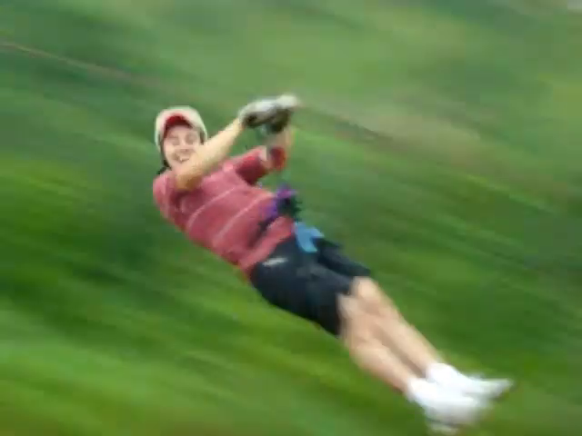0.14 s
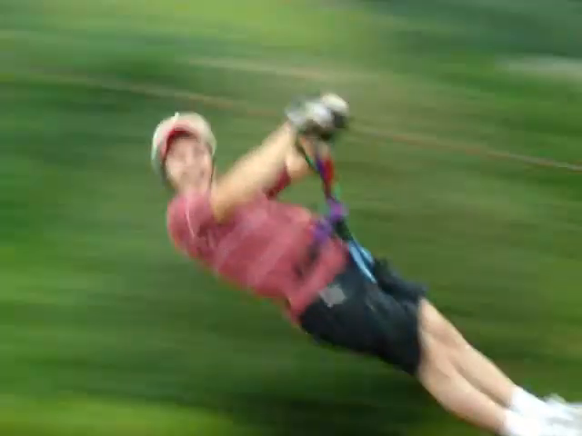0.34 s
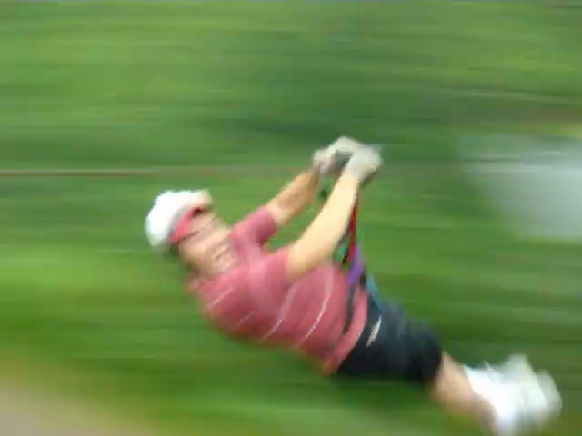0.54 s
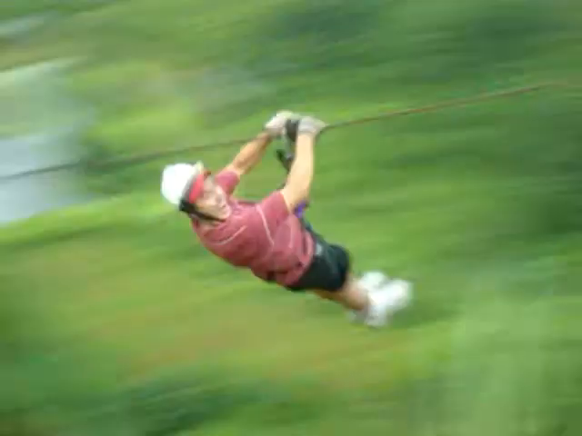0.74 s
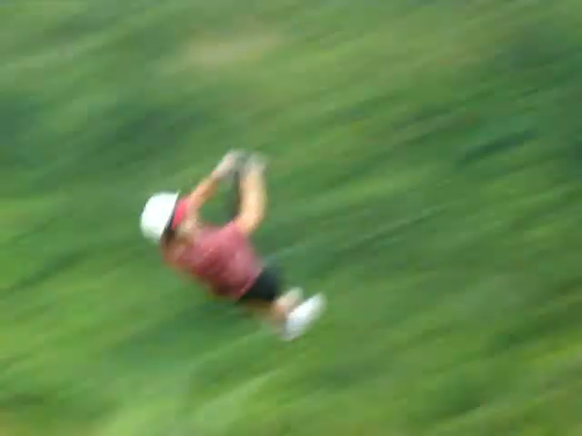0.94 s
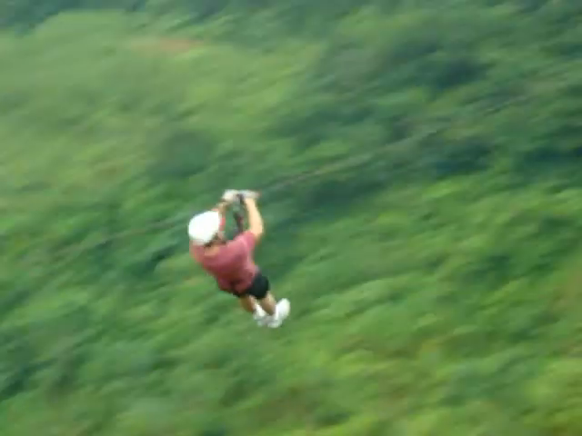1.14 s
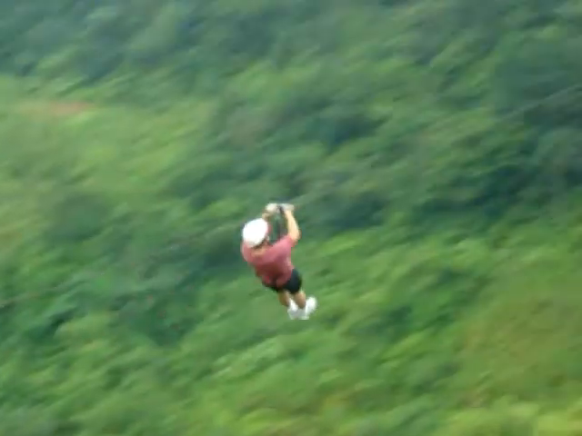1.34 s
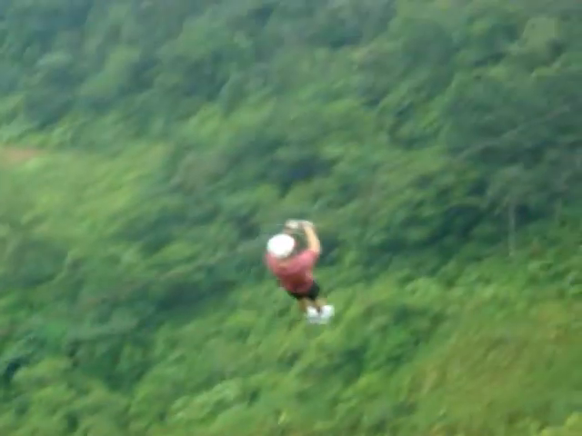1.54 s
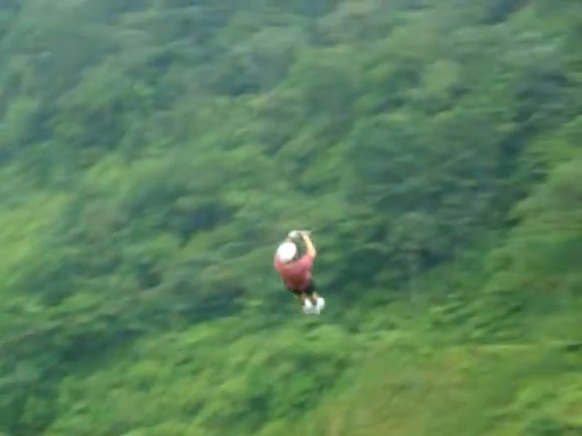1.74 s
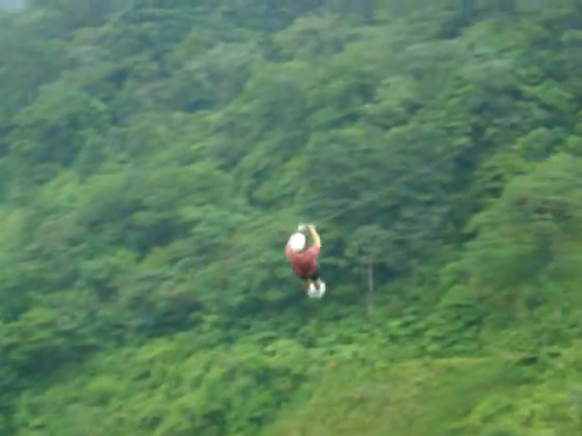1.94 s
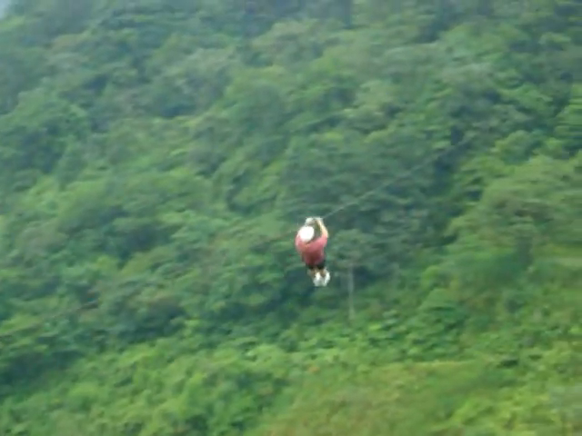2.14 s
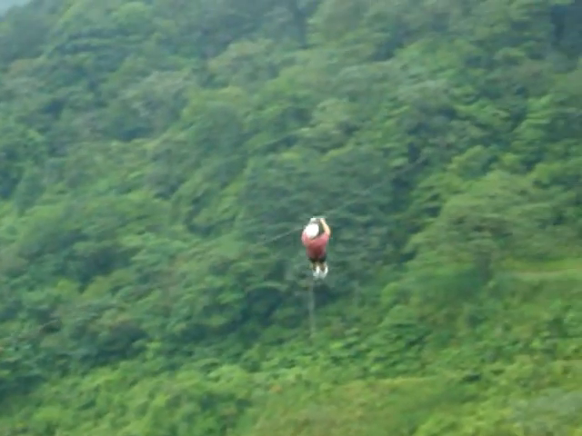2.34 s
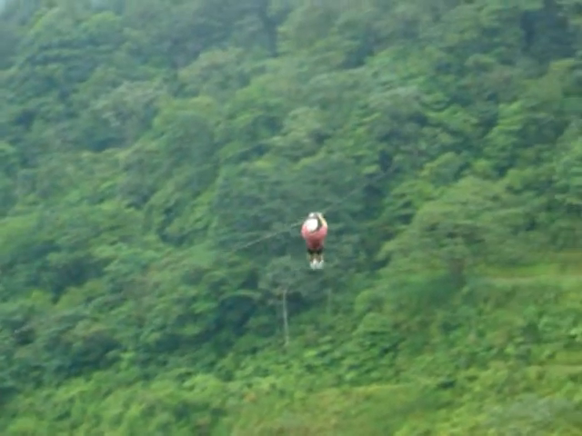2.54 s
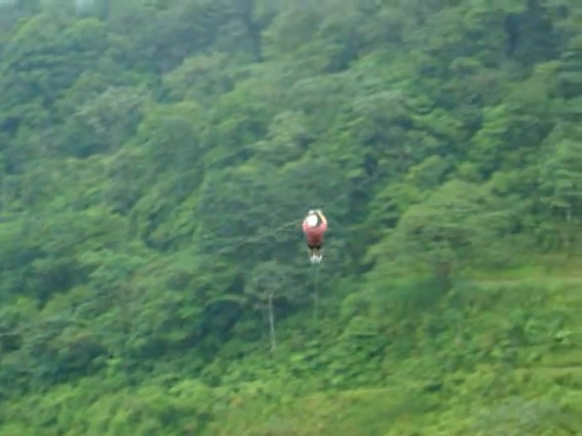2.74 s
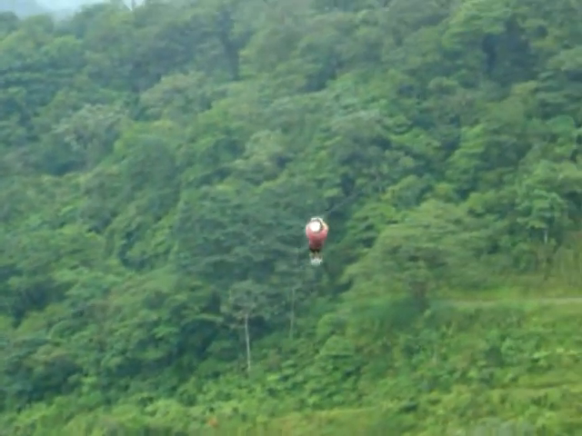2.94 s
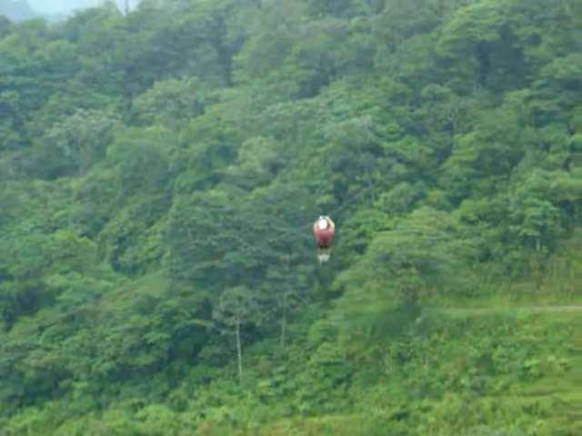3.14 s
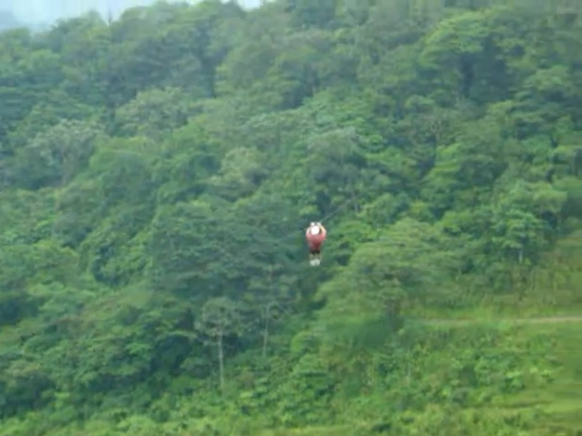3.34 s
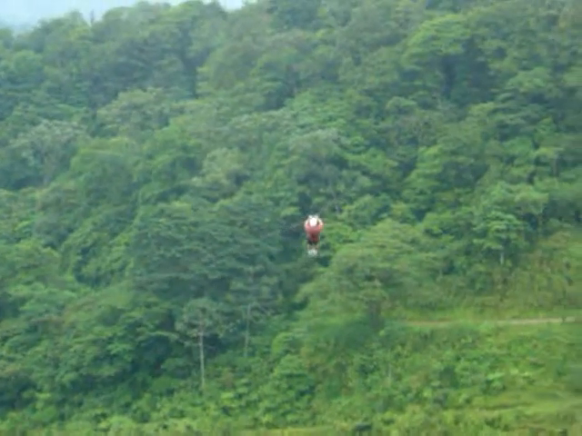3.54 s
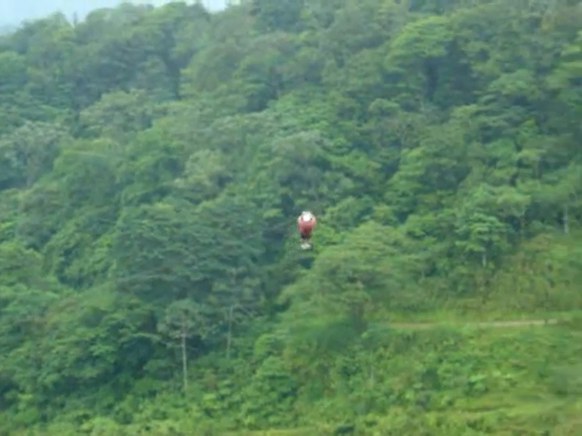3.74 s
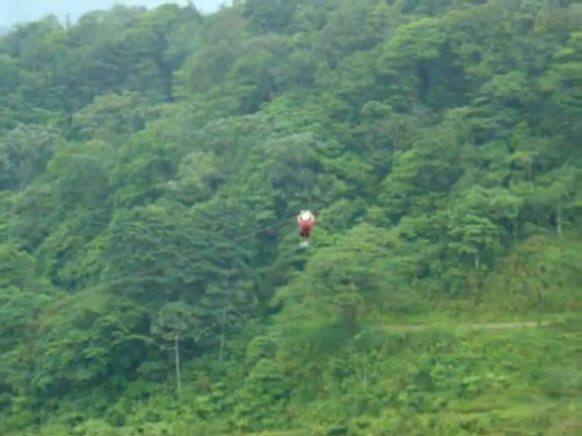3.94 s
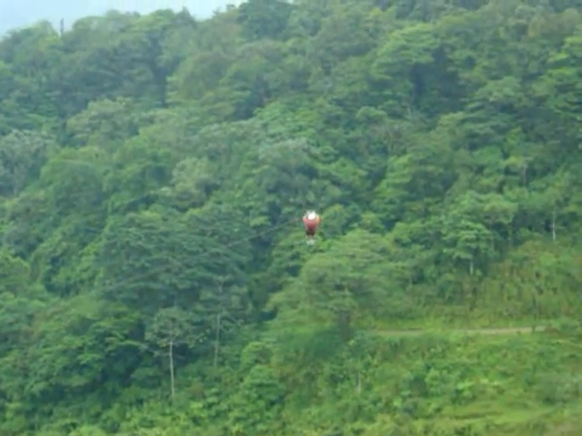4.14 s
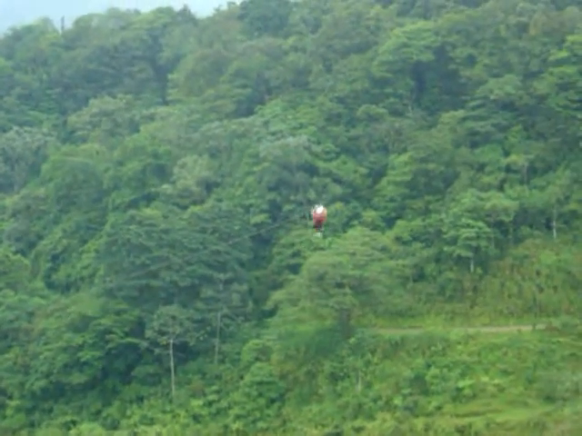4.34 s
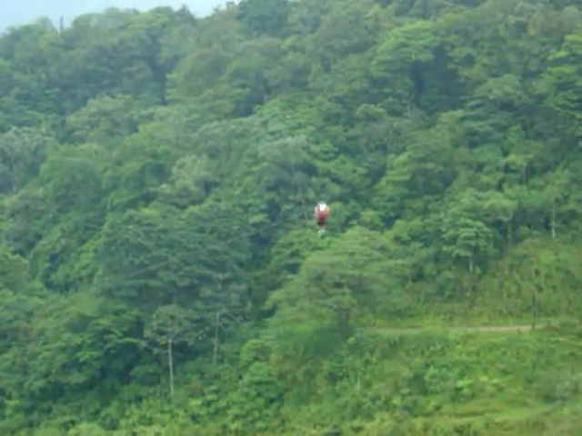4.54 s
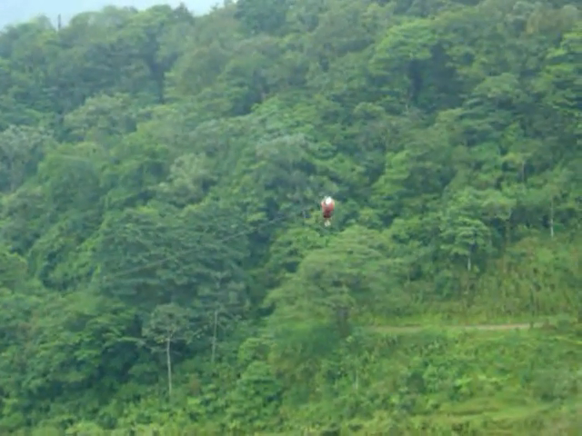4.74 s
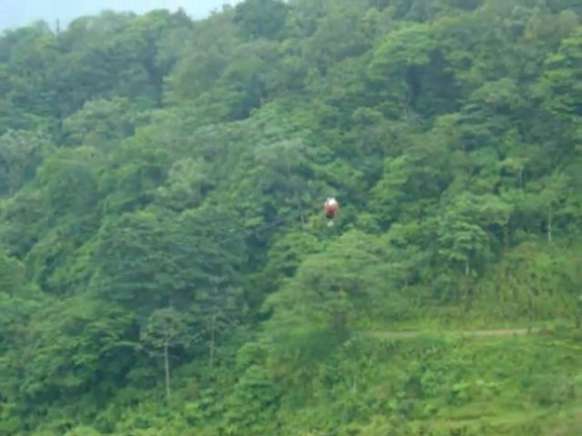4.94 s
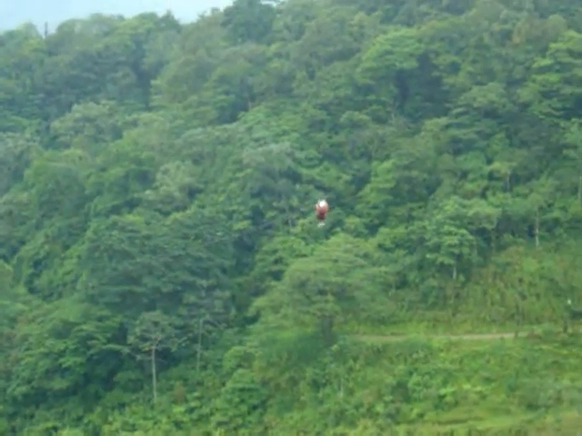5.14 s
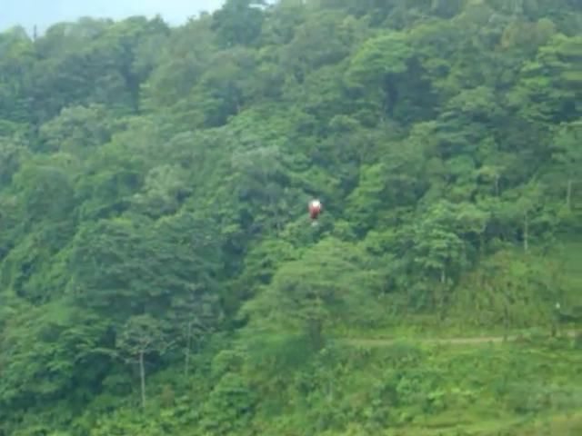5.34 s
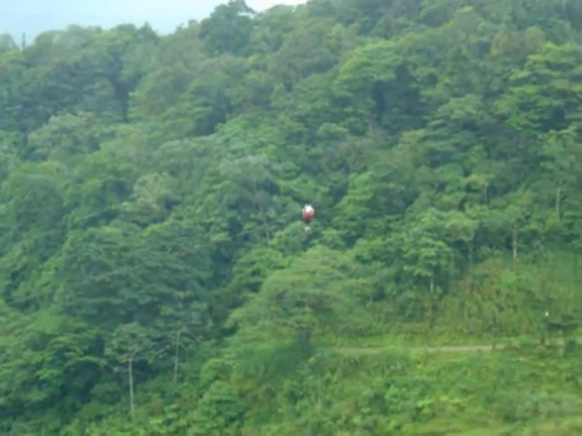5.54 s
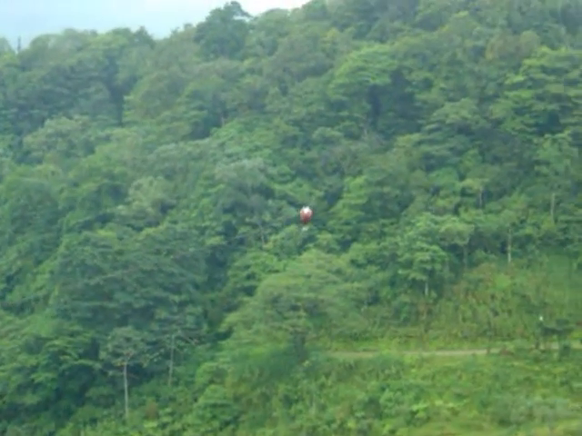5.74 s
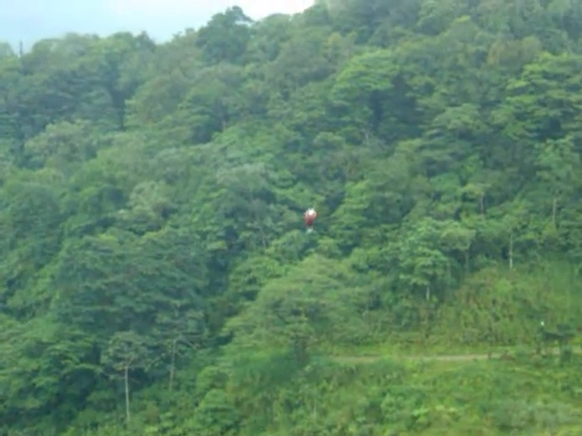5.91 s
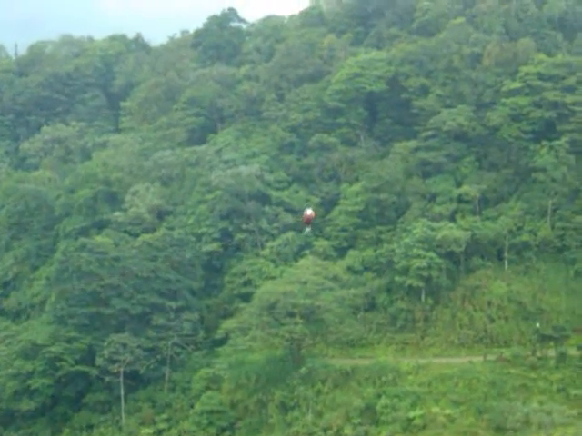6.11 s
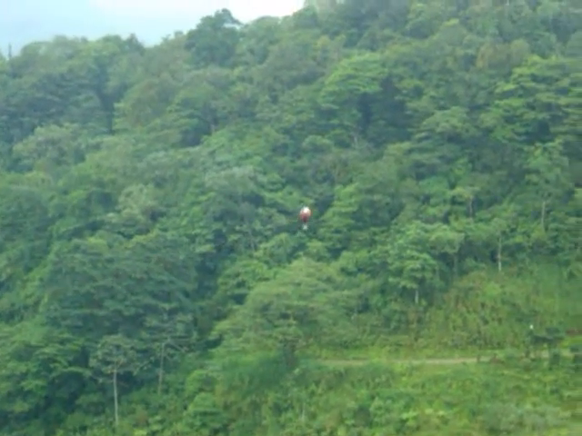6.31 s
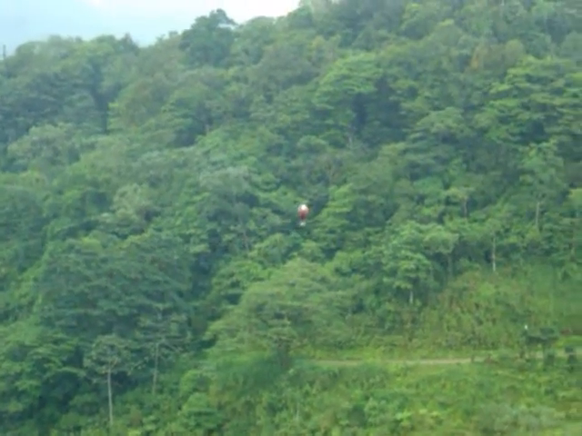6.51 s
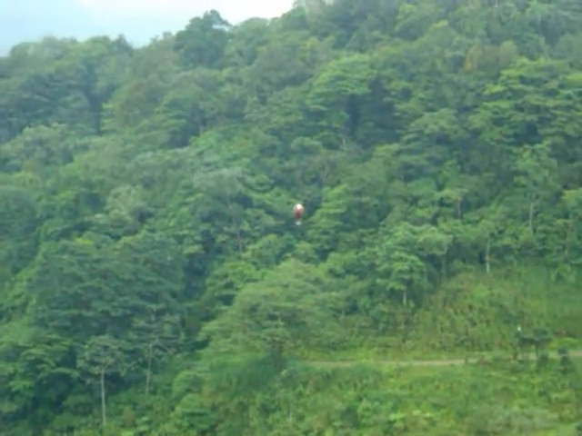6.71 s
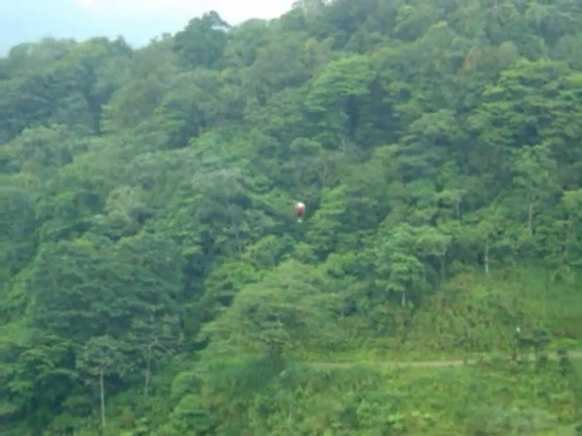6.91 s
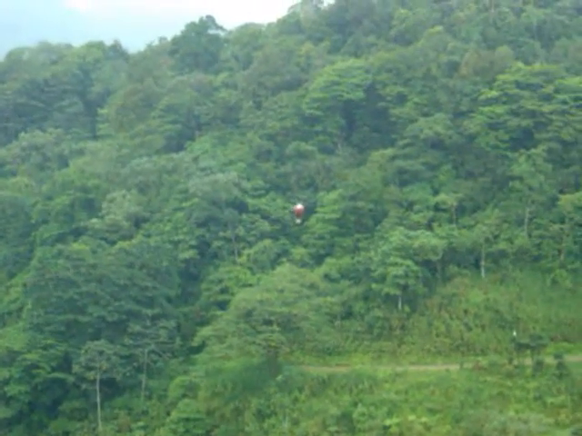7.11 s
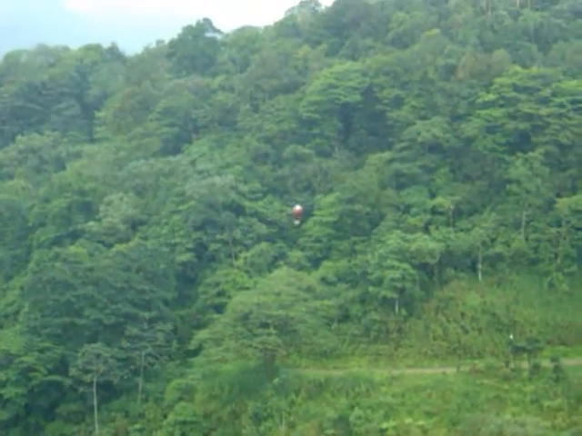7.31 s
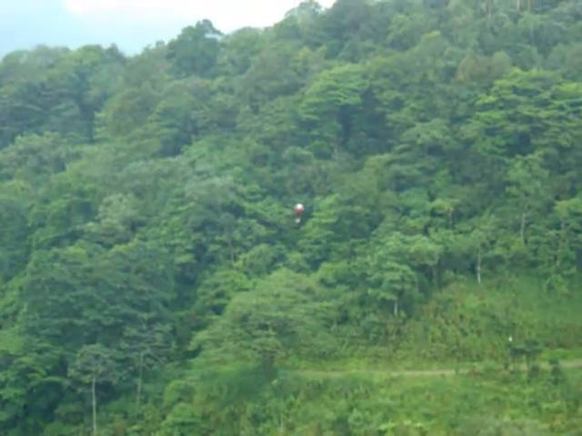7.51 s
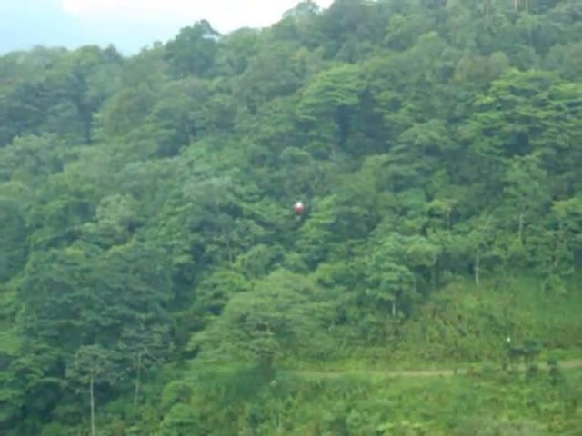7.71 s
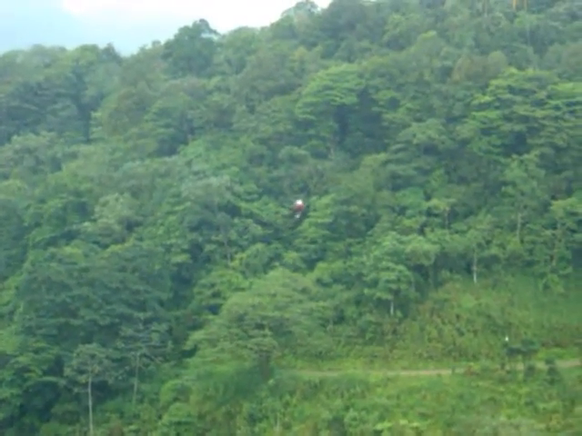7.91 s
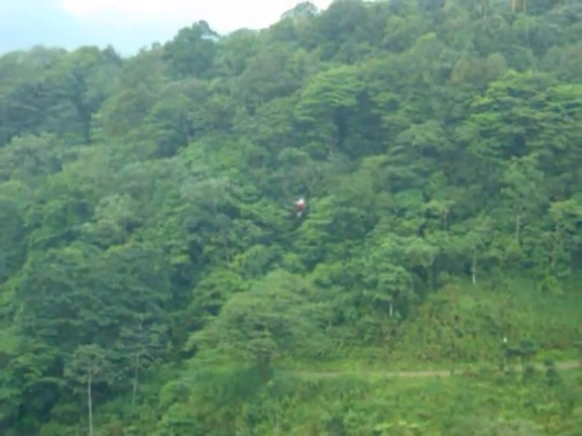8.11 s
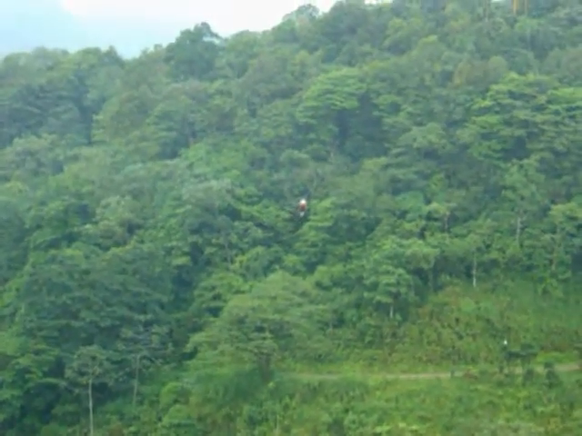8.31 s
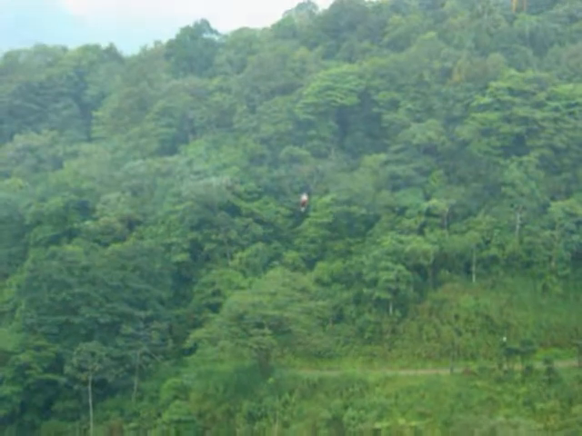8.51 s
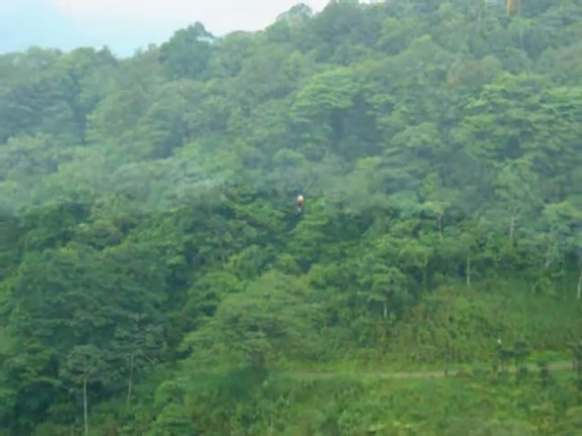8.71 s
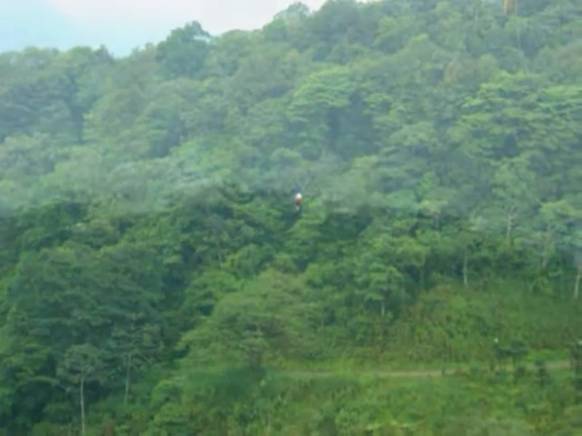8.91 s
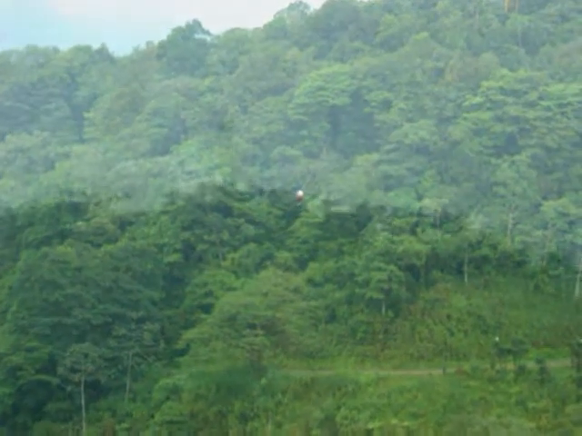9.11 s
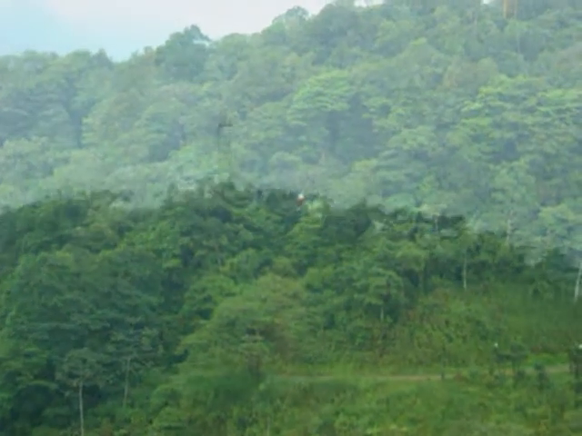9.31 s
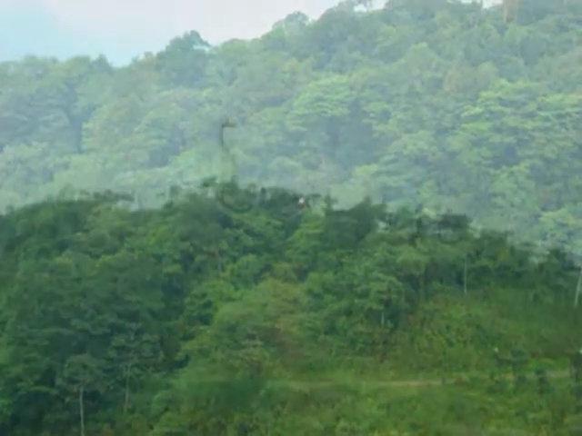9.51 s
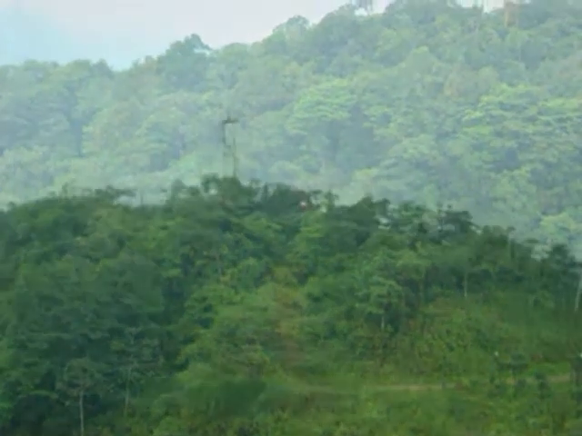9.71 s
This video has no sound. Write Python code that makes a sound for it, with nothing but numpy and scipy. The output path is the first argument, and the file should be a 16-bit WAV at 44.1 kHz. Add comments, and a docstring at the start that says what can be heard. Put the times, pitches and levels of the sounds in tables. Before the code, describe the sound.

Loud raspy whine of wheels on a steel cable sweeps past, falls in pitch and recedes into the distance, with light wind thumping the microphone.

```python
"""On a platform above a wooded valley, a zip line trolley rushes past and runs away down the cable.
Its wheels drum over the twisted strands of the steel cable: sine harmonics make a falling whine.
Noise shaped by resonances makes the rasp of the ringing metal, with hiss and short rattles.
Wind buffets the microphone with short swings of pressure and low noise. Behind it lie a wash
of air, a faint hum and, at the end, a thin whistle. The sound is mono."""
import sys
import numpy as np
from scipy import signal
from scipy.fft import rfft, irfft, next_fast_len
from scipy.io import wavfile
from scipy.ndimage import uniform_filter1d

SR = 44100
rng = np.random.default_rng(int(sys.argv[2]) if len(sys.argv) > 2 else 0)


def master_out(mix):
    """Clip the mix to full scale and print it as 16-bit PCM to the path in sys.argv[1]."""
    frames = np.transpose(np.atleast_2d(mix))
    ceiling = np.clip(frames, -1, 1)
    pcm = np.round(ceiling * 32767).astype(np.int16)
    wavfile.write(sys.argv[1], SR, pcm)


N = 430416
TIME = np.arange(N) / SR
# noise is shaped in short frames: frame times in seconds, and the frequencies in Hz within each frame
FRAME_S = np.arange(N // 256 + 5) * 256 / SR
BINS = np.fft.rfftfreq(1024, 1 / SR)


def amp(db):
    """Turns decibels into gain."""
    return 10 ** (np.asarray(db) / 20)


def unit(x):
    """Scales a signal to rms 1."""
    return x / np.sqrt(np.mean(x ** 2) + 1e-20)


def curves(rows, t):
    """Reads the columns of a timed table at times t, with straight lines between rows."""
    s, *columns = np.transpose(rows)
    return [np.interp(t, s, column) for column in columns]


def swell(t, s, half_s):
    """A smooth bump of height 1 around time s."""
    return np.exp(-((t - s) / half_s) ** 2)


def fade_in(t, s, over_s):
    """A smooth step from 0 to 1 around time s."""
    return (1 + np.tanh((t - s) / (2 * over_s))) / 2


def colour(points, hz):
    """Gain of a spectrum table at frequencies hz."""
    f, db = np.transpose(points)
    return amp(np.interp(np.log(hz + 1), np.log(f), db))


def resonances(modes, hz):
    """Gain of a set of steep-sided resonances, added as power."""
    power = sum((amp(db) / (1 + ((hz - f) / width) ** 2)) ** 2 for f, width, db in modes)
    return np.sqrt(power)


def wander(rate_hz):
    """Random drift of rms 1, mostly slower than the given rate."""
    size = next_fast_len(N)
    f = np.fft.rfftfreq(size, 1 / SR)
    spectrum = rfft(rng.standard_normal(size))
    return unit(irfft(spectrum / (1 + (f / rate_hz) ** 2))[:N])


def noise(gain):
    """Noise with the given short-time spectrum; a frame whose squared gains sum to 1 has rms 1."""
    a, b = rng.standard_normal((2, len(FRAME_S), len(BINS)))
    size = 2 * (len(BINS) - 1)
    _, sound = signal.istft(((a + 1j * b) * gain).T, nperseg=size, noverlap=size * 3 // 4)
    return sound[:N] * np.sqrt(3 / 2)


def spread(gain):
    """Scales each frame's spectrum to power 1."""
    return gain / np.linalg.norm(gain, axis=-1, keepdims=True)


def patches(depth_db):
    """Random gain patches a few hundred Hz wide and some 50 ms long."""
    z = rng.standard_normal((len(FRAME_S), len(BINS)))
    smooth = uniform_filter1d(uniform_filter1d(z, size=9, axis=0), size=7, axis=1)
    return amp(depth_db * unit(smooth))


# Colour of the valley air. Each row: frequency in Hz, relative level in dB per Hz.
VALLEY = [(30, -21), (150, -1.5), (400, 0.5), (700, -0.5), (900, -4.5), (2000, -3), (5000, -8.5),
          (10000, -25), (15000, -17)]
# Loudness of the wash of air. Each row: time in seconds, level in dB.
AIR = [(0, -35.5), (1, -52), (2.5, -50), (4, -47.5), (5.5, -43.5), (7.5, -44), (9.76, -45.5)]
# a faint low hum that comes and goes
HUM_HZ, HUM_DB, HUM_FROM_S, HUM_TO_S, HUM_FADE_S = 80.7, -64, 2, 5.2, 0.069
# a thin far whistle that fades in
WHISTLE_HZ, WHISTLE_DB, WHISTLE_FROM_S, WHISTLE_FADE_S = 1569, -54, 9.2, .08


def background():
    """A wash of air made of shaped noise, and a hum and a whistle made of slightly unsteady sines."""
    humming = fade_in(TIME, HUM_FROM_S, HUM_FADE_S) - fade_in(TIME, HUM_TO_S, HUM_FADE_S)
    hum = amp(HUM_DB) * humming * np.sin(2 * np.pi * HUM_HZ * TIME + .5 * wander(3))
    whistling = fade_in(TIME, WHISTLE_FROM_S, WHISTLE_FADE_S)
    whistle = amp(WHISTLE_DB) * whistling * np.sin(2 * np.pi * WHISTLE_HZ * TIME + .5 * wander(12.2))
    air_db, = curves(AIR, TIME)
    air = amp(air_db) * noise(spread(colour(VALLEY, BINS)) * patches(depth_db=2.5))
    return air + np.sqrt(2) * (hum + whistle)  # a sine of peak sqrt(2) has rms 1


# Light breeze on the microphone, level in dB.
BREEZE_DB = -56.5
# Gusts over the breeze. Each row: middle in seconds, half length in seconds, level in dB.
GUSTS = [(.12, 0.23, -48), (1.1, 0.46, -57), (5.35, 0.5, -49.5), (6.6, 1, -47.5), (9.55, 0.26, -48.5)]
# Eddies that thump the microphone.
# Each row: middle in seconds, peak level in dB before a common trim, pitch in Hz, half length in seconds.
BUFFETS = [(.035, -34, 220, .012), (.07, -38, 70, .025), (.8, -43, 140, .012), (.87, -44, 80, .02),
           (1.395, -37, 120, .013), (4.22, -33, 150, .009), (4.245, -38, 100, .012), (4.71, -36, 140, .011),
           (6.1, -39, 100, .022), (6.925, -34, 120, .015), (6.95, -39, 70, .02), (7.0, -37, 120, .013),
           (7.76, -37, 125, .018), (9.144, -33, 160, .006), (9.251, -33, 145, .011),
           (9.274, -35, 170, .008), (9.29, -25, 215, .005), (9.305, -34, 80, .016), (9.4, -38, 120, .009),
           (9.448, -37, 110, .008), (9.573, -35, 140, .008)]
# Colour of the wind rumble. Each row: frequency in Hz, relative level in dB per Hz.
RUMBLE = [(15, -11), (35, -3), (70, 3.5), (130, 1.5), (200, 0), (300, -5.5), (600, -20), (1500, -32),
          (6000, -80)]


def wind(lumpy_db=2.7, stir_db=-12, thump_db=-2.5):
    """Lumpy turbulence swells in gusts; each eddy is a short swing of pressure in a stir of rumble."""
    power = amp(BREEZE_DB) ** 2
    power += sum((amp(db) * swell(TIME, s, half_s)) ** 2 for s, half_s, db in GUSTS)
    breeze = np.sqrt(power) * amp(lumpy_db * wander(16))
    thumps = np.zeros(N)
    for (s, db, hz, length), start in zip(BUFFETS, rng.random(len(BUFFETS))):
        near = abs(TIME - s) < 10 * length
        t = TIME[near]
        swing = np.cos(2 * np.pi * (hz * (t - s) + start))
        thumps[near] += amp(db + thump_db) * swell(t, s, length) * swing
        breeze[near] += amp(db + stir_db) * swell(t, s, 2 * length)
    return thumps + breeze * noise(spread(colour(RUMBLE, BINS)))


# The trolley rattles. Each row: time in seconds, starting level in dB.
RATTLES = [(.19, -21), (.421, -16), (.834, -13), (.92, -15), (7.165, -26), (7.367, -24), (7.481, -21)]
# Resonances of the trolley's frame, also used by the rasp.
# Each row: frequency in Hz, width in Hz, relative level in dB. The rasp shifts their pitch.
FRAME = [(2505, 400, -0.31), (2825, 300, -1.1), (3280, 450, -1.6)]
# Colour of steel rubbing on steel, also used by the hiss.
# Each row: frequency in Hz, relative level in dB per Hz.
RUBBING_COLOUR = [(300, -48), (900, -19), (1600, -6.5), (3000, -21), (3750, -2.5), (4200, 2), (5000, 0.5),
                  (6300, -0.5), (6500, -2.5), (8300, -6), (9300, -9.5), (9950, -12.5), (10200, -19.5),
                  (15500, -16)]


def rattles(decay_s=0.011):
    """Short knocks that ring the frame: bursts of noise that start at once and die away."""
    blows = sum(amp(db) * (TIME >= s) * np.exp(-abs(TIME - s) / decay_s) for s, db in RATTLES)
    return blows * noise(spread(resonances(FRAME, BINS) + 0.25 * colour(RUBBING_COLOUR, BINS)))


# the ride: moment of the closest pass, speed and distance then
PASS_S, SPEED_M_PER_S, NEAREST_M = .545, 22.04, 7.7
SOUND_M_PER_S = 343
# the trolley is side-on to the microphone around this moment, for this long either way
SIDE_ON_S, SIDE_ON_HALF_S = 0.6, .19
# it turns its back to the microphone around this moment, with this time scale
BEHIND_S, BEHIND_OVER_S = 5.5, .5


def doppler(t):
    """Pitch factor of the moving trolley: above 1 as it comes, below 1 as it goes."""
    along_m = SPEED_M_PER_S * (t - PASS_S)
    closing = along_m / np.hypot(along_m, NEAREST_M)  # from -1 coming to 1 going
    return 1 / (1 + SPEED_M_PER_S / SOUND_M_PER_S * closing)


# Loudness of steel rubbing on steel. Each row: time in seconds, level in dB before the trims below.
RUBBING = [(0.0, -20.5), (0.32, -18.5), (0.43, -23), (0.54, -24.5), (0.65, -25.5), (0.81, -21), (1.71, -27),
           (1.87, -26), (5.76, -38.5), (6.66, -31.5), (6.93, -35), (7.18, -32), (7.23, -36.5), (7.5, -34.5),
           (7.72, -36.5), (9.43, -53.5), (9.71, -49.5), (9.76, -52)]


def hiss(hiss_db=1.88, side_db=-2, top_side_db=3.5, top_behind_db=-1.0):
    """Spectrum of the rubbing: its treble is brightest side-on and dullest from behind."""
    side = swell(FRAME_S, SIDE_ON_S, SIDE_ON_HALF_S)
    behind = fade_in(FRAME_S, BEHIND_S, BEHIND_OVER_S)
    level, = curves(RUBBING, FRAME_S)
    treble = np.clip((BINS - 5000) / 3000, 0, 1)  # rises from 5 to 8 kHz
    top = top_side_db * side + top_behind_db * behind
    level_db = (level + hiss_db + side_db * side)[:, None] + top[:, None] * treble
    return amp(level_db) * spread(colour(RUBBING_COLOUR, BINS))


# How loudly the trolley's metal rings, with distance and the roughness of the cable.
# Each row: time in seconds, level in dB before the trims below.
ROLLING = [(0.0, -18.5), (0.05, -17.5), (0.62, -19), (0.68, -18.5), (1.0, -18.5), (1.63, -23),
           (1.85, -22.5), (2.23, -27.5), (4.54, -31), (4.81, -34), (5.73, -34.5), (6.82, -30),
           (6.96, -32.5), (7.18, -28), (7.26, -31.5), (7.5, -27.5), (8.42, -34), (9.76, -45.5)]
# The cable's low ring. Each row: time in seconds, level in dB before the trims below.
CABLE_RING = [(0.0, -36), (0.02, -36.5), (0.24, -33), (0.57, -21), (0.62, -23.5), (1.14, -43),
              (1.44, -35.5), (3.07, -35), (3.7, -33.5), (4.08, -36.5), (4.24, -34.5), (5.95, -41),
              (7.37, -37.5), (8.59, -42), (9.13, -45.5), (9.76, -43.5)]
# The band around 2 kHz dips briefly, as a reflection from the ground cancels it.
# Each row: middle in seconds, half length in seconds, change in dB.
GROUND_DIPS = [(.92, .11, -18), (1.825, 0.14, -2.5)]


def ring_levels(t, cable_db=-2.0, cable_side_db=-1.0, wheel_db=-9.5, wheel_behind_db=3,
                frame_db=-1.0, frame_behind_db=-.5):
    """Levels in dB of cable, wheels and frame: the cable shifts side-on, the others from behind."""
    side, behind = swell(t, SIDE_ON_S, SIDE_ON_HALF_S), fade_in(t, BEHIND_S, BEHIND_OVER_S)
    cable, = curves(CABLE_RING, t)
    rolling, = curves(ROLLING, t)
    dips = sum(db * swell(t, s, half_s) for s, half_s, db in GROUND_DIPS)
    return (cable + cable_db + cable_side_db * side,
            rolling + wheel_db + wheel_behind_db * behind + dips,
            rolling + frame_db + frame_behind_db * behind)


# Resonances of the cable, the wheels, and the frame from far behind, before the rasp shifts their pitch.
# Each row: frequency in Hz, width in Hz, relative level in dB.
CABLE = [(525, 110, -20.5), (718, 53, -15), (1230, 44, -15.5), (1225, 81, -3), (1442, 210, -6.5)]
WHEEL = [(1937, 126, -1.5), (2036, 135, 3.5)]
FRAME_FAR = [(2400, 250, -3), (2780, 250, 3), (3100, 470, -9), (3380, 500, -2)]
# the cable's highest resonance sets in once the trolley has gone by
GONE_S = 1.4
# The rasp flares in one band.
# Each row: middle in seconds, half length in seconds, frequency in Hz, width in Hz, level in dB.
SIZZLES = [(0.565, 0.21, 1560, 200, -30.5), (.62, 0.37, 9400, 506, -30.5), (0.833, .1, 3850, 350, -25.5),
           (1.07, 0.058, 2620, 170, -22.5), (1.447, 0.23, 1430, 100, -34.5), (1.866, 0.1, 2720, 140, -28),
           (2.138, .03, 2780, 100, -28), (6.6, .35, 9150, 250, -42), (7.4, 0.52, 3650, 350, -33.5),
           (7.9, 1, 9400, 130, -55), (8.198, 0.77, 1225, 45, -43), (8.55, 0.2, 7060, 900, -46)]


def rasp(tuning=.99, patchy_db=1.0, flutter_db=.5, grain_db=0.52):
    """The rough cable shakes wheels and frame and hisses under the wheels; the ring falls on passing."""
    # resonances are tuned to the end of the ride, so earlier frames are shifted against it
    shift = tuning * doppler(FRAME_S) / doppler(FRAME_S[-1])
    hz = BINS / shift[:, None]
    gone = fade_in(FRAME_S, GONE_S, over_s=.06)[:, None]
    behind = fade_in(FRAME_S, BEHIND_S, BEHIND_OVER_S)[:, None]
    cable = (1 - gone) * resonances(CABLE[:-1], hz) + gone * resonances(CABLE, hz)
    frame = (1 - behind) * resonances(FRAME, hz) + behind * resonances(FRAME_FAR, hz)
    power = hiss() ** 2
    for shape, level in zip((cable, resonances(WHEEL, hz), frame), ring_levels(FRAME_S)):
        power += (amp(level)[:, None] * spread(shape)) ** 2
    for s, half_s, band_hz, width, db in SIZZLES:
        band = spread(resonances([(band_hz, width, 0)], BINS))
        power += (amp(db) * swell(FRAME_S, s, half_s)[:, None] * band) ** 2
    contact = amp(flutter_db * wander(38) + grain_db * wander(380))  # wheel pressure flutters
    return noise(np.sqrt(power) * patches(patchy_db)) * contact


def line(phase, width_hz, smear, skirt=0.37):
    """One partial of rms 1; the uneven cable smears its phase and adds a noisy skirt."""
    noisy = np.clip(skirt * smear, 0, 1)
    phase = phase + smear * wander(width_hz / 2)
    fuzz = wander(width_hz) * np.cos(phase) + wander(width_hz) * np.sin(phase)
    return np.sqrt(2 * (1 - noisy)) * np.cos(phase) + np.sqrt(noisy) * fuzz


# rate at which the wheels meet the strands, before the pitch change of passing, and how it sags
STRAND_HZ, SLOWING_PER_S2 = 182.2, .001188
# Strand harmonics carried by the cable, the wheels and the frame.
# Each row: harmonic number, level in dB against that part's ring, change in dB per second,
# line width in Hz, smear from 0 to 1.
CABLE_HARMONICS = [(5, -9, -3, 15, 0.9), (6, -6.5, -1.21, 11, 0), (7, 2.5, -2, 20, .12)]
WHEEL_HARMONICS = [(11, -3, -1.45, 18, 0.7), (12, -5.5, 0.33, 36, 0.4), (13, -10.5, 0.28, 100, 0.8)]
FRAME_HARMONICS = [(17, -16, 0.98, 35, 0.86), (18, -19, 1.5, 47, 0.5), (24, -13, -.8, 80, 0.6)]
# One harmonic of the whine swells for a moment.
# Each row: middle in seconds, half length in seconds, harmonic number, level in dB.
HARMONIC_SWELLS = [(.16, .06, 18, -26), (.22, .07, 12, -28), (.3, 0.099, 24, -33), (.55, 0.082, 24, -32),
                   (0.455, 0.073, 17, -20), (.56, 0.077, 18, -19), (.69, 0.056, 12, -27), (.8, .1, 24, -32),
                   (1.327, 0.078, 12, -32.5), (3.0, 0.68, 12, -39.5), (3.06, 0.15, 18, -32),
                   (7.225, 0.24, 13, -36), (7.52, 0.17, 18, -32), (7.9, 0.37, 18, -35.5),
                   (8.75, 0.045, 18, -37), (9.08, 0.13, 18, -42)]


def whine(unsteady=0.00093, waver_db=-0.36, waver_hz=3, swell_width_hz=50, swell_smear=0.88):
    """Harmonics of the strand rate, which falls as the trolley passes and then sags slowly."""
    rate = STRAND_HZ * doppler(TIME) * (1 - SLOWING_PER_S2 * TIME ** 2)
    phase = 2 * np.pi * np.cumsum(rate * (1 + unsteady * wander(5.7))) / SR
    out = np.zeros(N)
    carried = (CABLE_HARMONICS, WHEEL_HARMONICS, FRAME_HARMONICS)
    for level, harmonics in zip(ring_levels(TIME), carried):
        for harmonic, db, db_per_s, width, smear in harmonics:
            gain = amp(level + db + db_per_s * TIME + waver_db * wander(waver_hz))
            out += gain * line(round(harmonic) * phase, width, smear)
    # swells of the same harmonic share one line
    for harmonic in sorted({round(row[2]) for row in HARMONIC_SWELLS}):
        gain = sum(amp(db) * swell(TIME, s, half_s)
                   for s, half_s, k, db in HARMONIC_SWELLS if round(k) == harmonic)
        out += gain * line(harmonic * phase, swell_width_hz, swell_smear)
    return out


def scene():
    """Adds all the layers; one microphone feeds both channels."""
    mono = background() + wind() + rattles() + rasp() + whine()
    return np.tile(mono, (2, 1))


JITTER_HZ, EDGE_HZ = 12100, 15550  # rate of the timing error, and the upper band limit


def record(dry, jitter_samples=0.41):
    """A periodic timing error in the sampling mirrors the whir into the top treble; then the band limit."""
    slope = np.gradient(dry, axis=1)
    mirrored = dry + jitter_samples * np.cos(2 * np.pi * JITTER_HZ * TIME) * slope
    lowpass = signal.firwin(801, EDGE_HZ, window=("kaiser", 9), fs=SR)
    return signal.oaconvolve(mirrored, lowpass[None], "same")


dry = scene()
out = record(dry)
master_out(out)
```